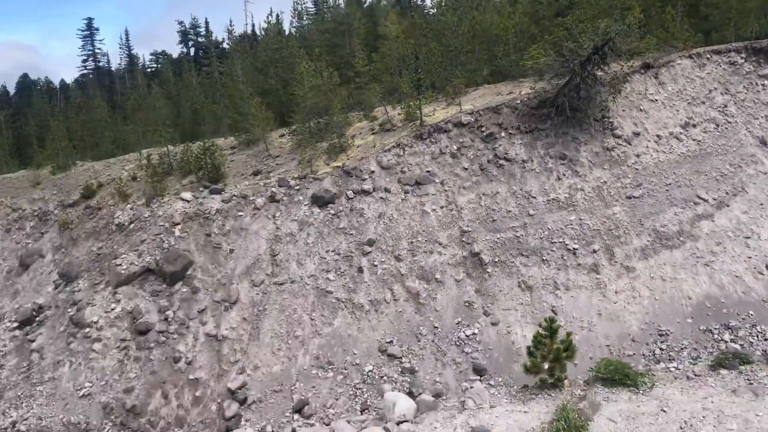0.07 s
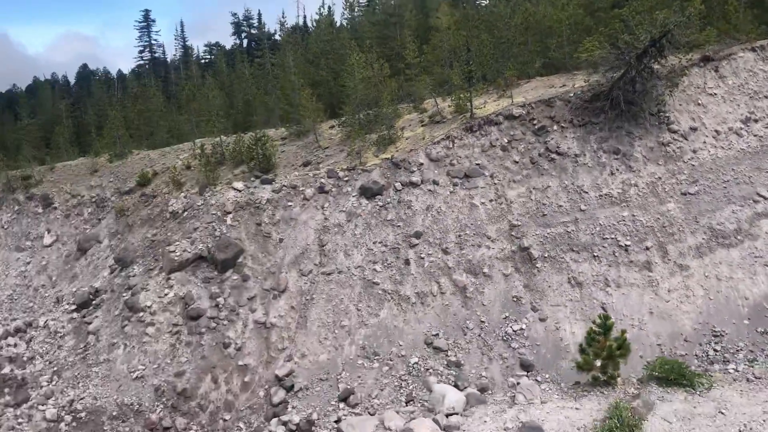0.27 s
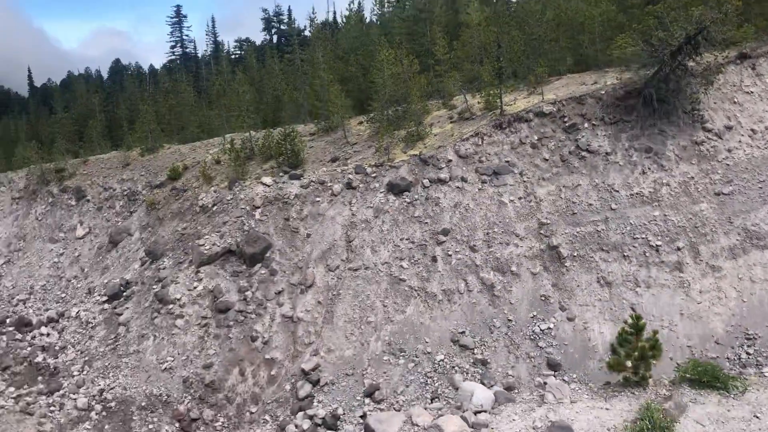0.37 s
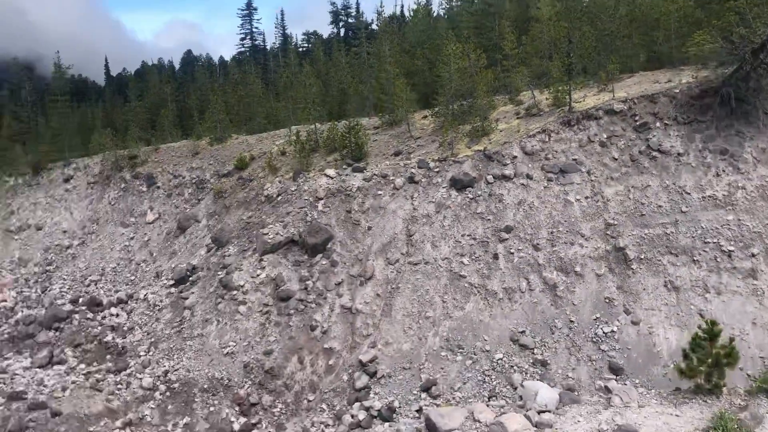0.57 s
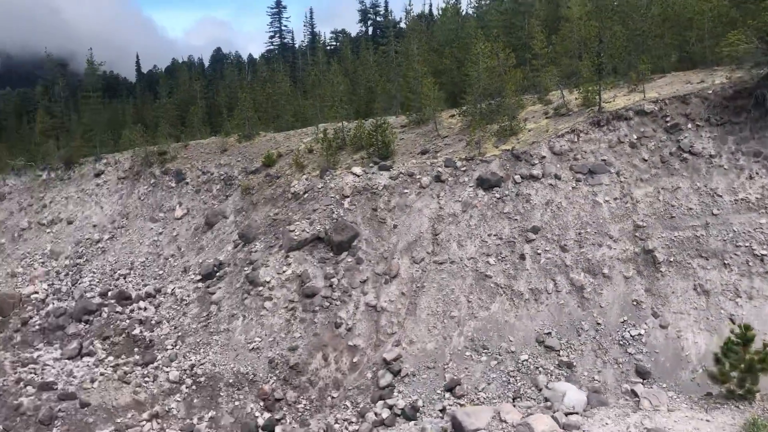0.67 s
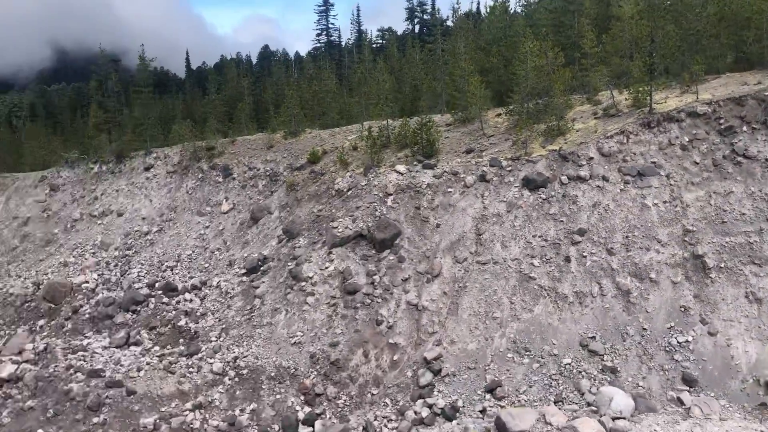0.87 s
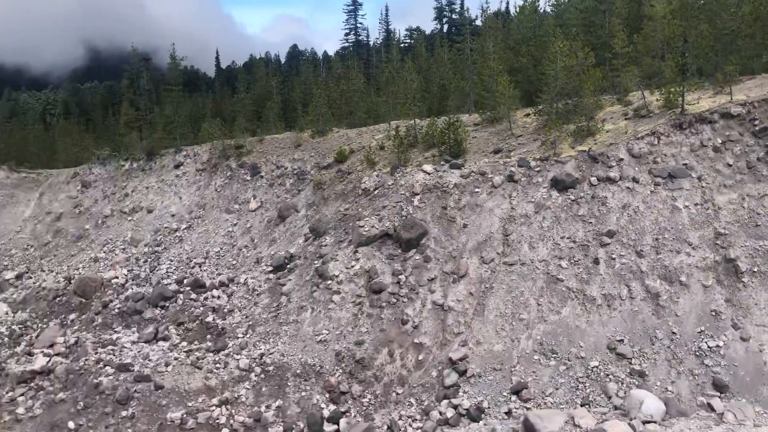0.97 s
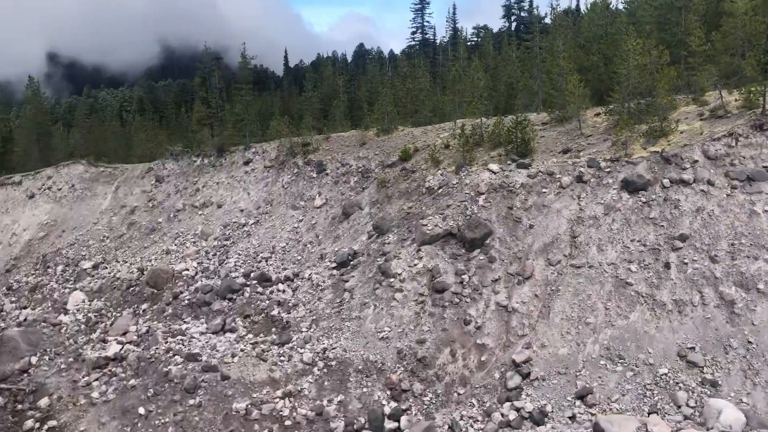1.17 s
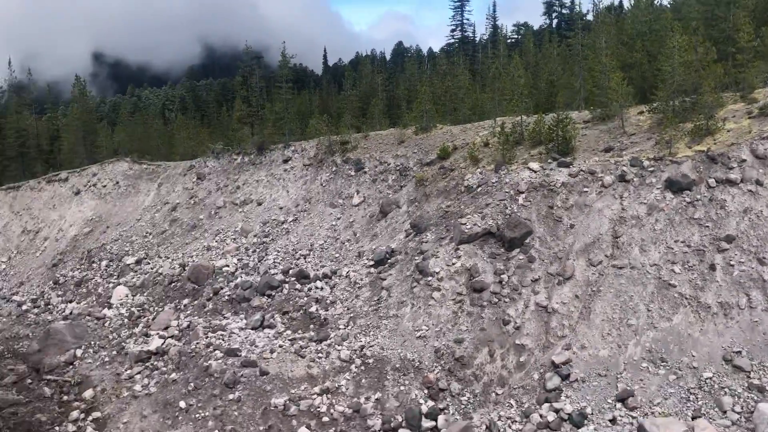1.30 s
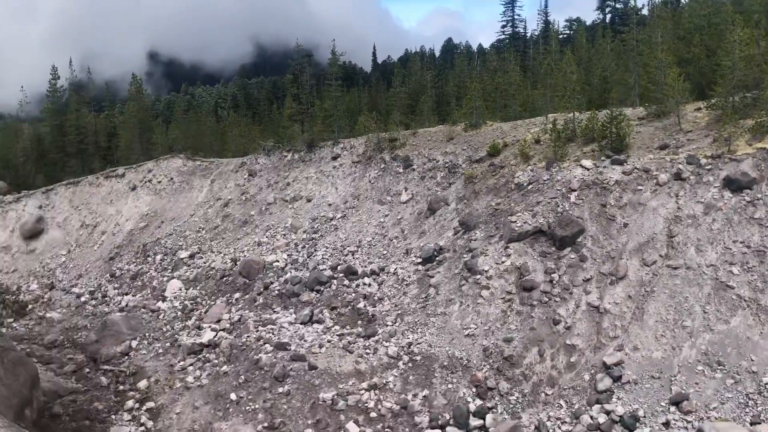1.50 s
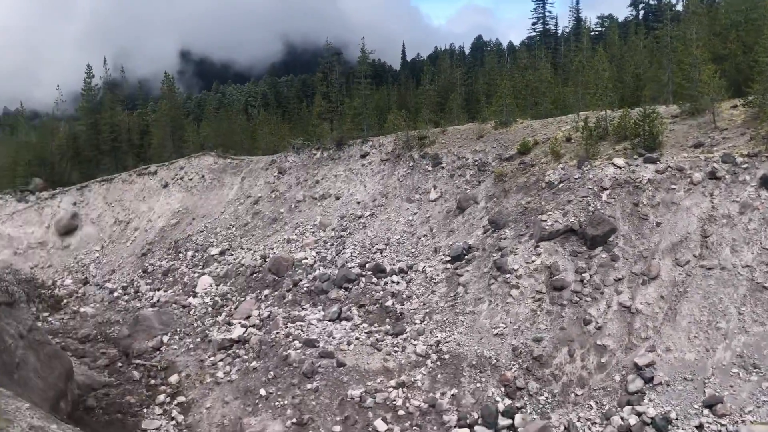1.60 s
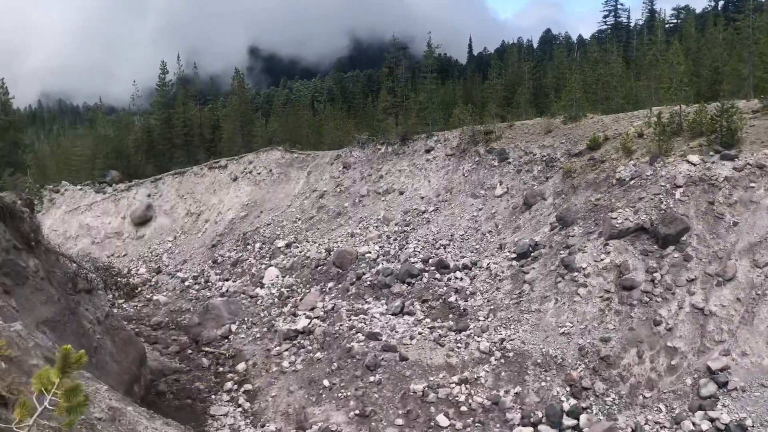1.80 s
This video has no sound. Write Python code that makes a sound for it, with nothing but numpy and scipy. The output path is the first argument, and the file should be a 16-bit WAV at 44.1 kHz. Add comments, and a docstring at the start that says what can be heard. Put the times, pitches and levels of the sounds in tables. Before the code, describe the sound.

Wind rumbles on the microphone over crunching gravel, then a small bird trills rapidly.

```python
"""Forest edge above a stony slope, one microphone, the soft hiss of the valley far behind.
Wind buffets the microphone with rumble and short thumps, hardest around half a second in.
Close by, gravel crunches and single stones tick and ring briefly, probably underfoot.
From just after one second a small bird trills: ten evenly spaced syllables, each a run of
four quick rising whistles, with faint echoes off the slope and the trees."""
import sys
import numpy as np
from scipy import signal
from scipy.fft import rfft, irfft, next_fast_len
from scipy.io import wavfile
from scipy.ndimage import uniform_filter1d

SR = 44100
rng = np.random.default_rng(int(sys.argv[2]) if len(sys.argv) > 2 else 0)


def put_to_file(sound):
    """Save the sound as 16-bit audio at rate SR, in the file named by the first command-line argument."""
    columns = np.atleast_2d(sound).T  # one column per channel
    safe = np.clip(columns, -1, 1)
    whole_steps = np.round(safe * 32767)
    wavfile.write(sys.argv[1], SR, whole_steps.astype(np.int16))


N = 81585
TIME = np.arange(N) / SR
CUTOFF_HZ = 15700


def from_db(db):
    return 10 ** (np.asarray(db) / 20)


def rms_one(x):
    return x / np.sqrt(np.mean(x ** 2) + 1e-20)


def level_curve(rows):
    """Join (time_s, level_db) points by straight lines."""
    return np.interp(TIME, *np.transpose(rows))


def coloured(noise, spectrum):
    """Shape a noise to a spectrum that falls away beyond both ends; rms 1."""
    hz, db = np.transpose(spectrum)
    size = next_fast_len(N)
    f = np.maximum(np.fft.rfftfreq(size, 1 / SR), 1)
    gain = from_db(np.interp(np.log(f), np.log(hz), db))
    skirts = np.minimum(np.minimum(f / hz[0], hz[-1] / f), 1) ** 2
    return rms_one(irfft(rfft(noise, size) * gain * skirts, size)[:N])


def dying_noise(t60):
    """Noise that falls by 60 dB in t60 seconds."""
    t = TIME[:int(t60 * SR)]
    return rng.standard_normal(len(t)) * np.exp(-np.log(1000) * t / t60)


# Spectrum of the distant valley air: frequency_hz, gain_db
VALLEY_SPECTRUM = [(60, -3.5), (250, 0), (450, 0.5), (750, -4.5), (1100, -8.5), (2000, -13), (3000, -13.5),
                   (4500, -13.5), (6000, -18.5), (9000, -20.5), (10000, -19.5), (11500, -23), (15500, -22)]


def valley(level_db=-70.5):
    """Far off, the air of the valley makes a smooth, steady hiss."""
    return from_db(level_db) * coloured(rng.standard_normal(N), VALLEY_SPECTRUM)


def turbulence(spectrum, smooth_s=0.018, evenness=0.52):
    """Noise with its chance swells partly evened out, so that the gusts set most of its level."""
    noise = coloured(rng.standard_normal(N), spectrum)
    window = np.hanning(int(2 * smooth_s * SR))
    power = np.maximum(signal.fftconvolve(noise ** 2, window / window.sum(), "same"), 1e-6)
    return rms_one(noise / power ** (evenness / 2))


# Rumble at the microphone as the gusts come and go: time_s, level_db
GUSTS = [(0, -64), (.08, -78), (.11, -59), (.15, -60), (.25, -48), (.32, -58.5), (.37, -53.5), (.43, -41.5),
         (.55, -41.5), (.6, -53.5), (.65, -52), (.74, -51), (.8, -57), (.96, -51.5), (1.04, -61),
         (1.1, -51.5), (1.17, -56), (1.33, -54.5), (1.6, -55.5), (1.68, -66), (1.75, -69), (1.79, -60.5),
         (1.85, -69)]
# Spectrum of the deep rumble: frequency_hz, gain_db
RUMBLE_SPECTRUM = [(22, -24), (35, -16), (50, 1), (70, 2.5), (100, -7.5), (140, -6), (200, -16.5),
                   (300, -26.5), (500, -52)]
# Spectrum of the flutter above it: frequency_hz, gain_db
FLUTTER_SPECTRUM = [(110, -28), (170, 1.5), (250, -2.5), (350, -6.5), (480, -10), (650, -23.5), (1000, -40)]


def wind():
    """Wind rumbles on the microphone; harder wind adds a higher flutter."""
    rumble_db = level_curve(GUSTS)
    flutter_db = -65 + 1.68 * (rumble_db + 51.5)   # gains 1.68 dB per dB of rumble
    rumble = from_db(rumble_db) * turbulence(RUMBLE_SPECTRUM)
    flutter = from_db(flutter_db) * turbulence(FLUTTER_SPECTRUM)
    return rumble + flutter


# Eddies that strike the microphone: start_s, peak_db, start_pitch_hz
EDDIES = [(0.114, -53.5, 112), (0.173, -49.5, 202), (.192, -49.5, 222.9), (.237, -38.5, 327),
          (0.273, -46, 170), (0.4038, -29.5, 638), (0.4338, -35.5, 510), (.446, -28, 320),
          (0.463, -33, 473), (0.4761, -32.5, 416), (.503, -35, 296), (.5215, -33, 540), (.5425, -31.5, 434),
          (.575, -33, 570), (0.591, -41, 110), (.662, -34.5, 433), (.718, -41.5, 247), (0.733, -37.5, 180),
          (.849, -45.5, 222), (.936, -48.5, 286), (.953, -43, 198), (.968, -44, 130), (1.07, -45.5, 205.4),
          (1.09, -46.5, 238), (1.12, -48, 126), (1.202, -44.5, 204), (1.226, -53.5, 180),
          (1.25, -46.5, 246), (1.275, -46, 205), (1.298, -42.5, 241.1), (1.318, -41, 137),
          (1.376, -45, 245), (1.406, -44, 148), (1.47, -42.5, 252), (1.53, -43, 310), (1.5436, -34.5, 251),
          (1.602, -44, 131), (1.771, -57.5, 260)]


def wind_thumps(rise_s=0.0033, decay_s=0.013, roughness=0.19):
    """Each eddy is a short thump on the microphone whose swings slow down as it passes."""
    out, t = np.zeros(N + SR), TIME[:SR // 10]
    period_growth = 0.453   # seconds of period gained per second: the pitch falls quickly
    envelope = (1 - np.exp(-(t / rise_s) ** 2)) * np.exp(-t / decay_s)
    envelope /= envelope.max()
    for start_s, peak_db, start_hz in EDDIES:
        cycles = np.log(1 + period_growth * start_hz * t) / period_growth
        swing = np.sin(2 * np.pi * (cycles + rng.random()))
        overtone = np.sin(2 * np.pi * (np.sqrt(2) * cycles + rng.random()))
        i = int(start_s * SR)
        out[i:i + len(t)] += from_db(peak_db) * envelope * (swing + roughness * overtone)
    return out[:N]


# Gravel shifting close to the microphone: time_s, level_db
CRUNCH_LEVELS = [(0, -69.5), (.03, -68), (.05, -86), (.1, -76), (.14, -71.5), (.22, -68.5), (.3, -76),
                 (.42, -69), (.55, -72.5), (.615, -74), (.645, -61), (.672, -58), (.685, -65.5), (.7, -62),
                 (.73, -72), (.76, -64.5), (.79, -70.5), (.88, -67), (.93, -69), (1.02, -73.5), (1.07, -79),
                 (1.13, -95), (1.165, -74), (1.21, -98), (1.6, -89), (1.85, -76)]
# Spectrum of the crunch: frequency_hz, gain_db
CRUNCH_SPECTRUM = [(300, -19), (700, 5), (1300, 1), (2000, -1.5), (3000, -5.5), (4200, -7.5), (5800, -14),
                   (9000, -21), (15000, -31)]


def gravel_crunch(grains_per_s=1800, spread_db=4, sand_gain=0.65):
    """Dense tiny grains and sliding sand crunch as the gravel shifts."""
    sizes = from_db(spread_db * np.minimum(rng.exponential(1, N), 4))
    signs = rng.choice([-1, 1], N)
    hits = rng.random(N) < grains_per_s / SR
    grains = rms_one(sizes * signs * hits)
    sand = sand_gain * rng.standard_normal(N)
    return from_db(level_curve(CRUNCH_LEVELS)) * coloured(grains + sand, CRUNCH_SPECTRUM)


def ring(contact, hz, t60):
    """One damped mode: a unit click sets a sine of height 1 ringing."""
    radius = np.exp(-np.log(1000) / (t60 * SR))
    angle = 2 * np.pi * hz / SR
    return signal.lfilter([0, np.sin(angle)], [1, -2 * radius * np.cos(angle), radius ** 2], contact)


# Lower modes of a typical stone: pitch_hz, gain_db, t60_s
BODY_MODES = [(1177, -6.5, 0.0081), (1880, -4, 0.0074), (2460, -4, 0.0037)]
# Upper modes that give it a bright snap: pitch_hz, gain_db, t60_s
BRIGHT_MODES = [(3800, -3.5, 0.0044), (4740, -5.5, 0.0031), (7500, -14, 0.0018), (11500, -15, 0.002)]
# Single stones knocking close by: start_s, level_db, snap_db, pitch_ratio (to the typical stone)
STONE_HITS = [(.1055, -49.5, 5.5, 0.94), (.1125, -49.5, -1, 0.95), (0.248, -53.5, -18, 1.1),
              (.4590, -53.5, -6, 1.06), (.4930, -37.5, -8.5, 0.97), (.5112, -46, -25, 0.95),
              (0.518, -45, -16, 0.67), (0.53, -50, -7, 0.87), (0.6482, -56.5, 9.5, 0.73),
              (.6695, -46.5, -9, 1.14), (0.672, -49, 7.5, 0.66), (0.693, -44, 1.5, 0.89),
              (0.6975, -54, -5, 0.57), (.7528, -60, 1.5, 2.34), (0.755, -60, 2, 2), (.803, -60, -8, 1.2),
              (.855, -54, -10, 0.5), (0.912, -53, -3, 0.93), (0.921, -47, -18, 0.92),
              (1.0183, -49.5, -6, 1.24), (1.0201, -44.5, -5, 0.93), (1.030, -44.5, -9, 0.75),
              (1.1660, -56, 9.5, 0.83), (1.169, -53, -11, 0.64), (1.271, -60, 2.5, 1.13),
              (1.326, -56.5, 4.5, 1), (1.600, -60, 3, 0.76), (1.81, -57, 5, 0.99)]


def stone_ticks(settle_db=-23, settle_t60_s=0.033, pitch_spread=0.04):
    """One sharp contact and a little settling grit set each stone ringing very briefly."""
    out = np.zeros(N + SR)
    for start_s, level_db, snap_db, pitch_ratio in STONE_HITS:
        contact = from_db(settle_db) * dying_noise(settle_t60_s)
        contact[0] = 1   # the knock itself
        snap_modes = [(hz, gain_db + snap_db, t60) for hz, gain_db, t60 in BRIGHT_MODES]
        i = int(start_s * SR)
        for k, (hz, gain_db, t60) in enumerate(BODY_MODES + snap_modes):
            detune = np.exp(pitch_spread * rng.standard_normal())
            mode = ring(contact, min(pitch_ratio * hz * detune, CUTOFF_HZ), t60)
            out[i:i + len(contact)] += (-1) ** k * from_db(level_db + gain_db) * mode
    return out[:N]


def echoes(sound, t60):
    """Many small reflections, about as strong in sum as the sound itself."""
    tail = dying_noise(t60)
    return signal.fftconvolve(sound, tail / np.linalg.norm(tail))[:N]


def whistle(ms, start_ms, middle_ms, end_ms, low_hz, high_hz, peak_db, soft_db):
    """A pure tone slides up an S-curve, loudest just past mid-sweep; no two are quite alike."""
    sweep_ms, fade_ms, swell_ms, swell_lag_ms = 1.6, 1.8, 2.6, 0.5
    offset_db, detune, delay_ms = rng.normal(0, [1, 0.007, 0.14])
    ms = ms - delay_ms
    waver = 0.0048 * rms_one(uniform_filter1d(rng.standard_normal(len(ms)), size=40))
    sweep_hz = low_hz + (high_hz - low_hz) / (1 + np.exp((middle_ms - ms) / sweep_ms))
    pitch_hz = sweep_hz * (1 + waver + detune)
    gate = np.clip(np.minimum(ms - start_ms, end_ms - ms) / fade_ms + 0.5, 0, 1)
    swell = np.exp(-0.5 * ((ms - middle_ms - swell_lag_ms) / swell_ms) ** 2)
    level_db = soft_db + (peak_db - soft_db) * swell + offset_db
    envelope = from_db(level_db) * np.sin(np.pi / 2 * gate) ** 2
    return envelope * np.sin(2 * np.pi * np.cumsum(pitch_hz) / SR)


# The four whistles of a full-strength syllable, as they reach the microphone:
# start_ms, middle_ms (of the sweep), end_ms, low_hz, high_hz, peak_db, soft_db (away from the peak)
SYLLABLE_WHISTLES = [(3.53, 2.4, 10, 4400, 5500, -66, -66), (10.5, 14.3, 20.6, 4350, 5620, -59, -68),
                     (20.1, 28.5, 35, 3830, 5600, -56, -69), (33.6, 43.7, 49.0, 3680, 5450, -58, -70)]
# Strength of each syllable in turn: gain_db
SYLLABLE_GAINS = [-8, -5.5, -3, -.5, 0, 0, -.5, 0, -1.5, -1.5]


def bird_trill(start_s=1.1315, period_s=0.0721):
    """At the forest edge a bird repeats one syllable, louder after the first few; slope and trees echo."""
    ms = 1000 * TIME[:int(period_s * SR)]
    song = np.zeros(N + SR)
    for k, gain_db in enumerate(SYLLABLE_GAINS):
        syllable = sum(whistle(ms, *row) for row in SYLLABLE_WHISTLES)
        i = int((start_s + k * period_s) * SR)
        song[i:i + len(ms)] += from_db(gain_db) * syllable
    song = song[:N]
    slope_echo = from_db(-14) * echoes(song, t60=0.05)
    forest_echo = from_db(-11) * echoes(song, t60=0.16)
    return song + slope_echo + forest_echo


def scene():
    """Valley, wind, nearby gravel and bird meet at one microphone."""
    return (valley() + wind() + wind_thumps() + gravel_crunch() + stone_ticks() + bird_trill())[None]


def record(dry):
    """A steep low-pass cuts the highest treble."""
    return signal.sosfilt(signal.ellip(12, 0.1, 70, CUTOFF_HZ, fs=SR, output="sos"), dry)


dry = scene()
out = record(dry)
put_to_file(out)
```